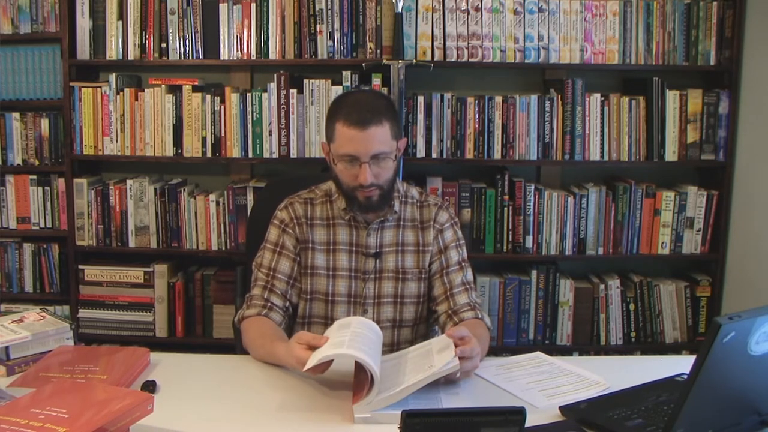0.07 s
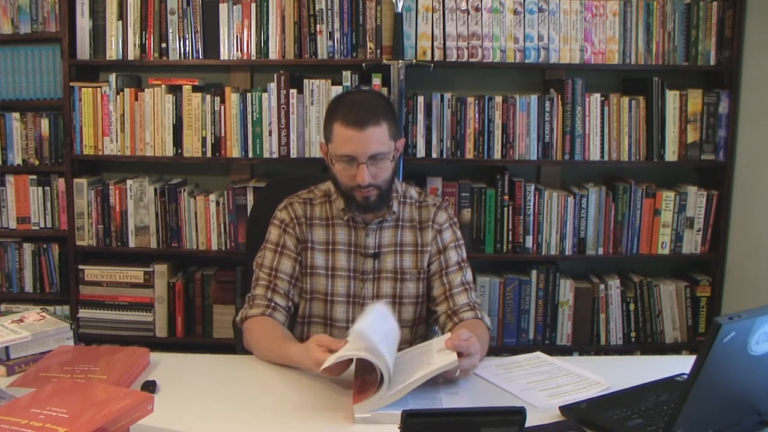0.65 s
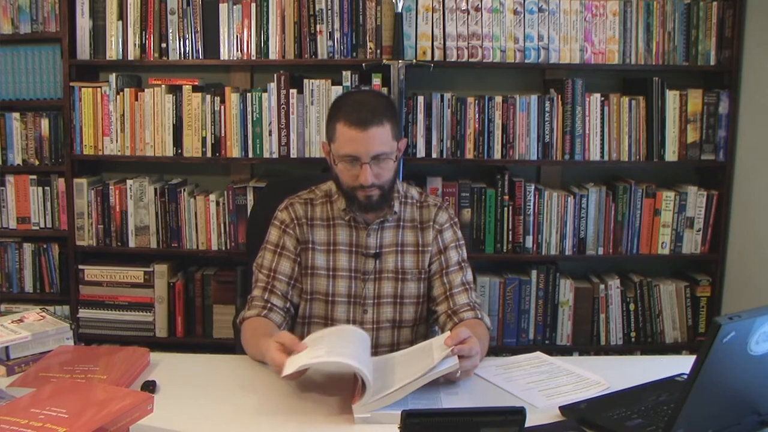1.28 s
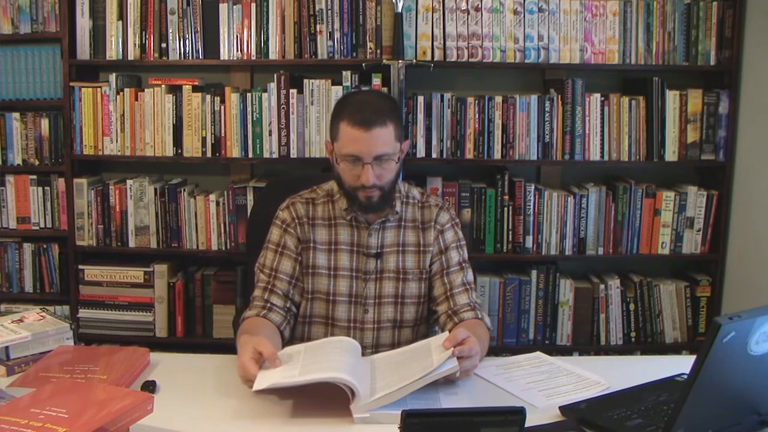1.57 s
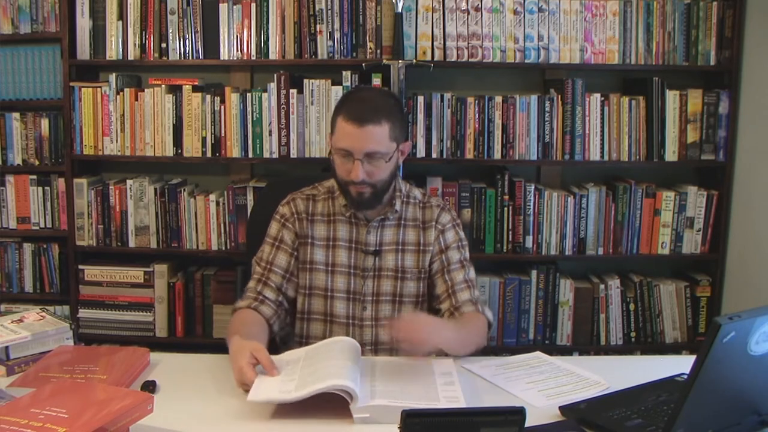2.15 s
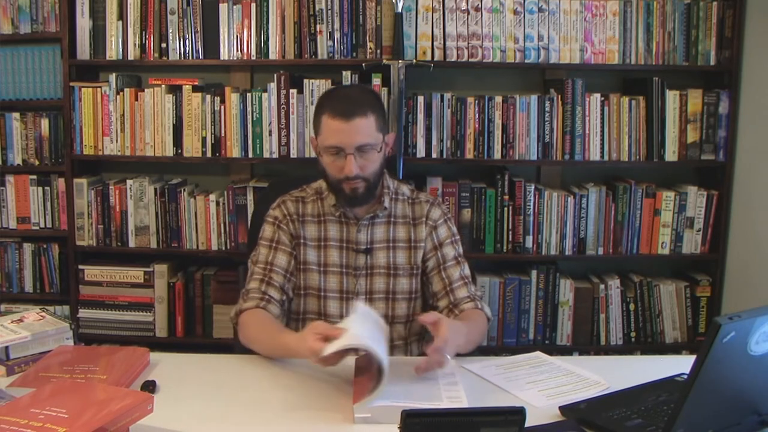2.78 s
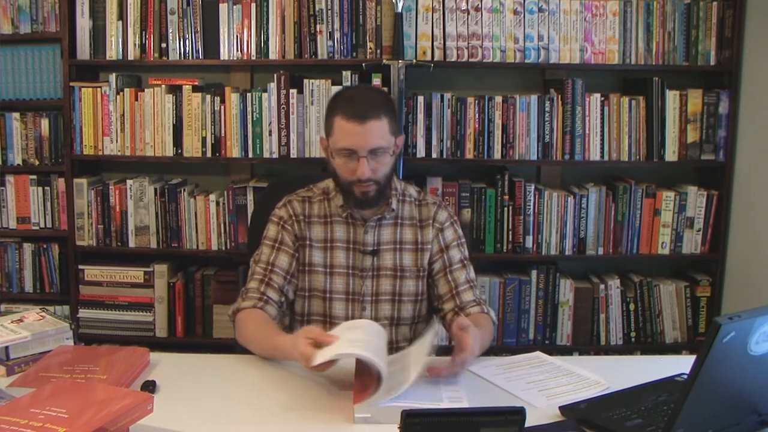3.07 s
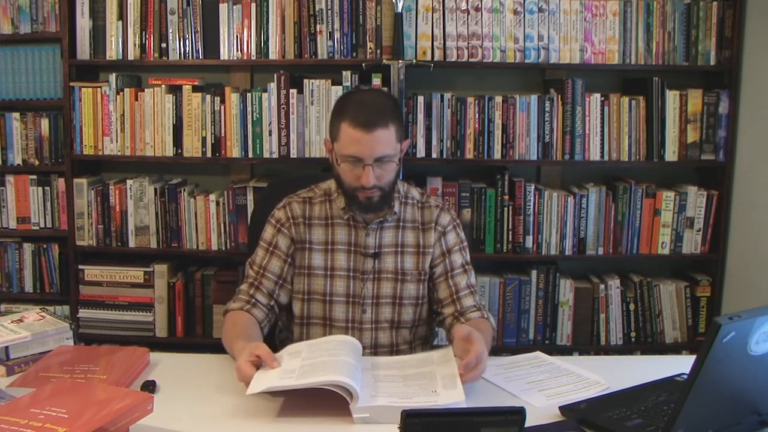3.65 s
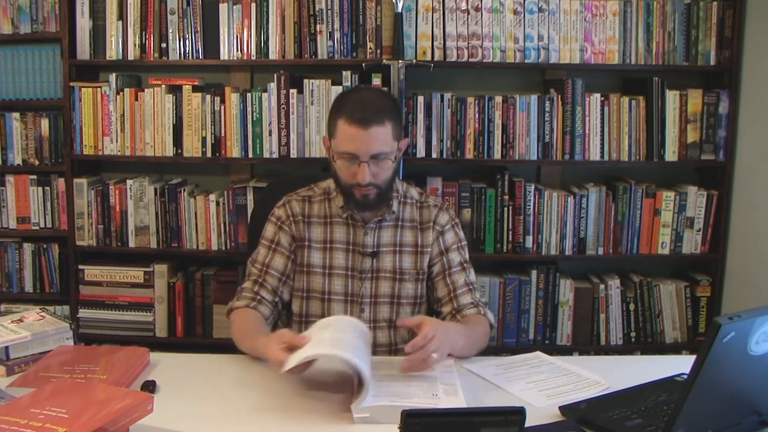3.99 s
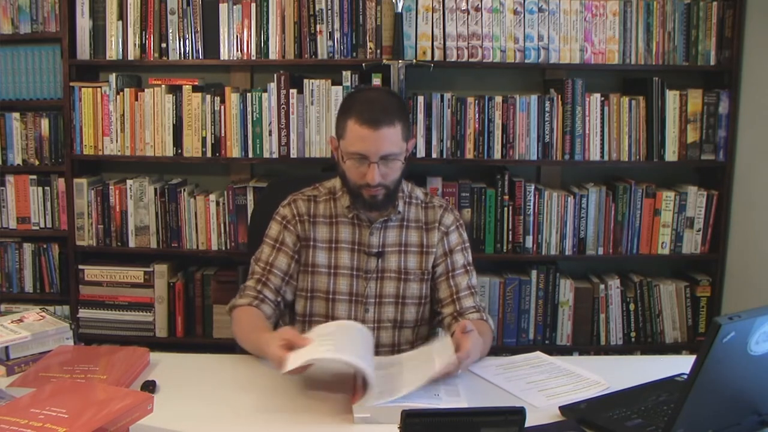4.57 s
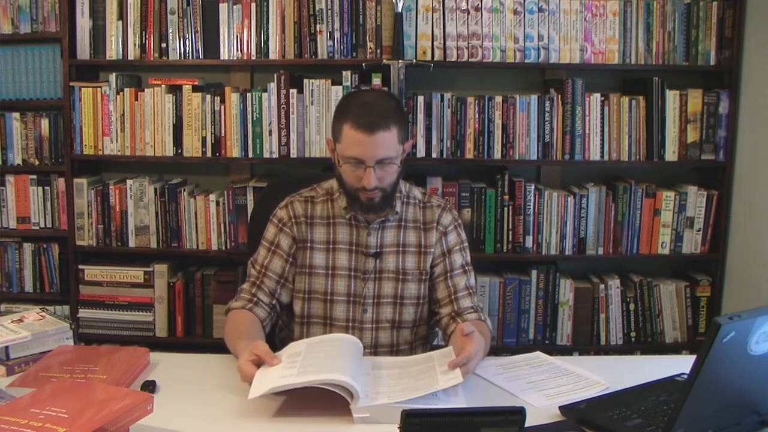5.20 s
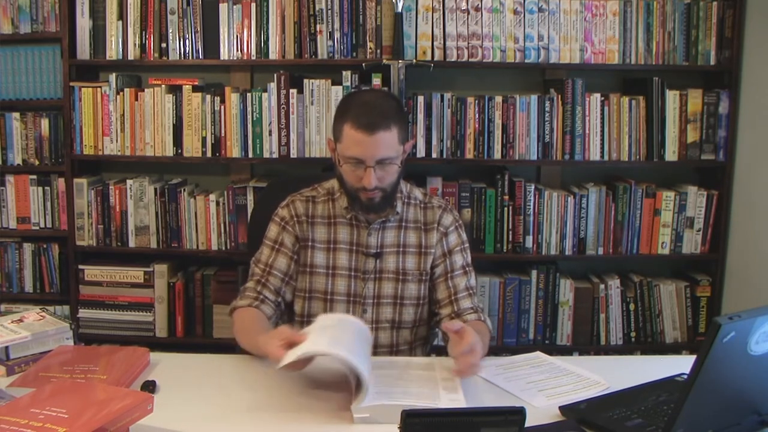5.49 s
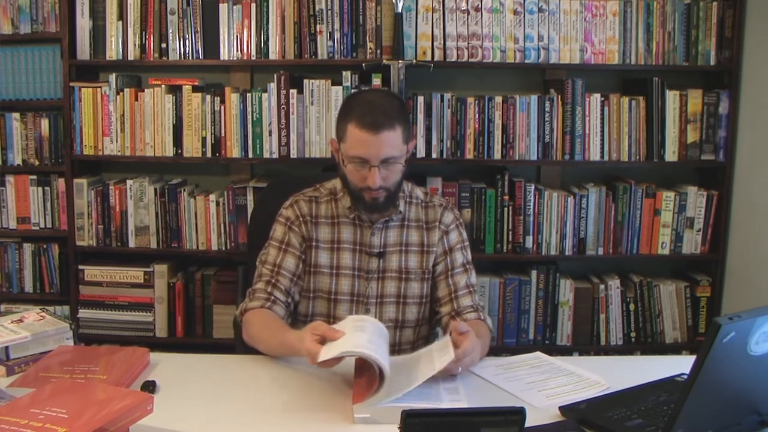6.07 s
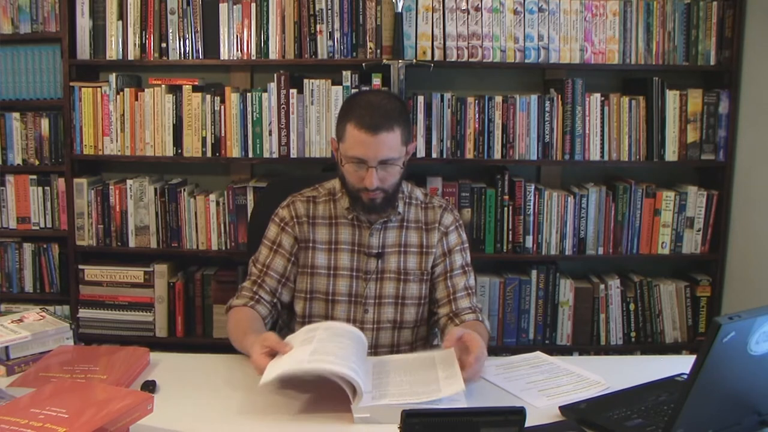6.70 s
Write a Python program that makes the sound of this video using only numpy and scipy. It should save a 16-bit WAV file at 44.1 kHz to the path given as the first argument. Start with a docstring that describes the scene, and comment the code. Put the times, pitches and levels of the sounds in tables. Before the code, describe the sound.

Close, dry paper sounds in a small, quiet room: the pages of a thick book slide, crackle lightly and flip over at an uneven pace. After the first few flicks, the pages land on the desk with one dull thud, the loudest moment. The leafing goes on with crisp ticks, soft flaps, dragging edges and a few gentle knocks. Short echoes follow, over faint room tone, rumble and hiss.

```python
"""Paper ticks and slides: someone leafs through a thick paperback at a desk in a small, quiet room.
Sliding sheets rub by fibre stick-slip, snap free of the thumb and flap over; dragging edges scrape.
Once the heavy block of pages drops and rings the desk; hands bump the book softly.
Short room echoes follow. Under it all lie a low rumble, room tone and a thin hiss."""
import sys
import numpy as np
from scipy import signal
from scipy.fft import rfft, irfft
from scipy.io import wavfile
from scipy.ndimage import uniform_filter1d

SR = 44100
rng = np.random.default_rng(int(sys.argv[2]) if len(sys.argv) > 2 else 0)


def waveform_to_disk(signal):
    """Save audio, clipped to [-1, 1], as 16-bit WAV at the path in sys.argv[1]."""
    frames = np.transpose(np.atleast_2d(signal))
    scaled = np.clip(frames, -1, 1) * 32767
    samples = np.round(scaled).astype(np.int16)
    wavfile.write(sys.argv[1], SR, samples)


N = 306054

# sheet or hand slides over paper: peak t/s, swell/s, fade/s, level/dB, swish offset/dB, fizz offset/dB
STROKES = [(.61, 0.072, 0.043, -76, 17, 6), (.64, 0.027, 0.02, -75, -2, 12), (.78, 0.11, .05, -73.5, 0, -7),
           (1.22, 0.2, 0.5, -73.5, 5.5, -9), (1.49, 0.094, 0.21, -78, -4, -4),
           (1.675, 0.086, 0.077, -59, 1, -7), (1.948, 0.047, 0.022, -67, 8, 10),
           (2.12, 0.099, 0.12, -68, 7, 8.5), (2.24, 0.17, 0.14, -68, 12, -10),
           (2.45, 0.15, 0.21, -63.5, -0.5, 2.5), (2.65, 0.035, 0.049, -68, 9.5, -10),
           (2.72, 0.1, 0.089, -64, 1, -5), (3.29, 0.095, 0.12, -77, 11.5, 4),
           (3.44, 0.14, 0.16, -69, 3.5, -10), (3.575, 0.062, 0.045, -60.5, 5.5, -6),
           (3.804, 0.042, 0.035, -64, -2, 5), (4.03, 0.079, 0.16, -64.5, -4.5, -3.5),
           (4.17, 0.06, 0.036, -68, 0.5, -14), (4.88, 0.22, 0.12, -66.5, -3.5, -12),
           (5.43, 0.12, 0.14, -67, -7, -2.5), (5.53, 0.071, 0.077, -66, -4, -8),
           (5.78, 0.077, 0.042, -70.5, 2, 0), (6.34, 0.23, 0.27, -67, 0.5, -18),
           (6.475, 0.066, 0.021, -65.5, 2, -2), (6.58, 0.075, 0.075, -67, -5, -12),
           (6.77, .025, 0.022, -67.5, -14, -2), (6.84, 0.059, 0.045, -69, -1, -4)]
# friction spectra (hollow swish, broad rub, fine fizz): f/Hz, level/dB
SWISH_SPECTRUM = [(150, -0.5), (400, 0.5), (720, 3), (1100, -2.5), (1700, -3), (2400, -14), (3500, -20),
                  (8000, -40)]
RUB_SPECTRUM = [(800, -11), (1800, 4.5), (2300, 2.5), (3000, -0.5), (3600, -2), (4200, 0), (4800, -5),
                (6500, -9), (7800, -4), (10000, -14.5), (16000, -34)]
FIZZ_SPECTRUM = [(1500, -33), (4000, -4), (6000, -4), (8000, -1), (10500, -5), (15500, -9.5)]
# paper buckles, slips or is tapped: t/s, level/dB, ring f/Hz, crack offset/dB, crack low-pass f/Hz
SNAPS = [(0.495, -47.5, 1980, -18, 6000), (0.654, -48.5, 4460, 3.5, 13000), (0.6605, -54, 4900, 4, 12000),
         (1.029, -40.5, 10500, -2.5, 16000), (1.0342, -43, 920, -5, 4500), (1.0425, -49, 7350, -8, 11000),
         (1.164, -42, 1930, -1, 8460), (1.5407, -39.5, 645, -7, 4000), (1.795, -43.5, 1770, 4.5, 4600),
         (1.859, -39.5, 570, -7, 3000), (1.918, -40, 6500, -16, 13000), (1.932, -50, 8800, 2.5, 14000),
         (1.958, -45, 5300, -2, 13000), (2.1453, -30.5, 2050, -8, 7500), (2.146, -46, 10500, -6, 14000),
         (2.153, -41.5, 9000, -7, 15000), (2.1754, -37, 2440, 0.5, 7000), (2.407, -35.5, 716, -20, 3000),
         (2.764, -51, 3700, -3, 7000), (2.8708, -45.5, 1050, -13, 3500), (3.0065, -47.5, 1100, -5, 3500),
         (3.0549, -28.5, 2000, -13, 7540), (3.0548, -48.5, 6600, -7, 8000), (3.0691, -40, 4730, -14, 9000),
         (3.184, -42, 1170, 1, 5500), (3.1848, -49, 4840, -8, 8500), (3.298, -47, 2250, -12, 4000),
         (3.3404, -39, 2320, -0.5, 13000), (3.3459, -35, 4120, -8, 13900), (3.3464, -37, 8700, -18, 13000),
         (3.3615, -43, 8500, -1, 14000), (3.379, -47.5, 4100, 3, 9000), (3.623, -46, 1800, -5, 4500),
         (3.708, -45, 1760, -5, 3000), (3.798, -43.5, 5500, 2, 12600), (4.2782, -39, 525, -17, 9000),
         (4.2776, -42.5, 3600, -4, 9000), (4.279, -42, 5830, -19, 9000), (4.6755, -46, 1650, -12, 3500),
         (4.689, -51, 1940, -14, 3500), (4.7296, -36, 1880, -5, 7500), (4.735, -45, 4770, 2.5, 13000),
         (4.739, -39.5, 5000, -3, 11000), (4.7425, -28.5, 2070, -19, 5000), (6.093, -49, 1250, -14, 3000),
         (6.182, -41.5, 4700, 2.5, 13000), (6.1854, -41.5, 4400, -3, 12000), (6.197, -48, 4700, 5.5, 11500)]
# sheet flaps over or pats the pile: t/s, level/dB, swell/s, hold/s, low-pass f/Hz, hollow f/Hz
FLAPS = [(1.031, -40.5, 0.0021, 0.0017, 1600, 1426), (1.162, -56.5, 0.00077, .001, 2600, 690),
         (2.171, -38.5, 0.0014, 0.015, 720, 1196), (2.869, -58, 0.00059, 0.00092, 1700, 1080),
         (2.999, -68, 0.0006, 0.00081, 1500, 910), (3.342, -46, 0.0015, 0.028, 2210, 1235),
         (4.274, -55, .001, .001, 1590, 1280), (4.673, -64.5, 0.00083, 0.0091, 3200, 1780),
         (4.734, -36.5, 0.0027, 0.018, 4200, 1287), (4.7573, -42, 0.0027, 0.0043, 2190, 1070),
         (4.946, -55.5, 0.0029, 0.0078, 1180, 955), (6.083, -62.5, 0.0045, 0.0053, 2000, 1250),
         (6.181, -37.5, 0.0021, 0.0088, 2900, 1454), (6.1976, -35, 0.0028, 0.0095, 2380, 797),
         (6.327, -54.5, 0.01, 0.0055, 2000, 1344), (6.345, -55, .006, .006, 1200, 658),
         (6.478, -59.5, 0.0039, 0.005, 1700, 1195)]
# sheet flutter: f/Hz, level/dB
FLAP_SPECTRUM = [(40, -1), (90, 0.5), (170, -9), (360, -4), (460, 4), (545, 1), (640, 5.5), (830, 2),
                 (1200, 5), (1550, 1.5), (2150, -2.5), (2900, -15.5), (4500, -23), (9000, -10.5),
                 (16000, -41)]
# edge drags: peak t/s, swell/s, fade/s, level/dB, resonance f/Hz, glide/(oct/s), width factor
SCRAPES = [(1.667, 0.03, 0.044, -61, 2850, -.5, 1.5), (1.68, .04, 0.047, -65, 8400, -.4, .8),
           (1.69, 0.04, 0.041, -64, 1610, -1, 1.7), (1.94, .018, 0.019, -61.5, 4330, -0.097, 0.92),
           (2.09, 0.038, 0.064, -68, 13800, 0, 1.2), (2.147, .03, 0.015, -67, 9800, 0, 1.8),
           (2.215, 0.025, 0.068, -64, 6570, -0.1, 0.51), (2.365, 0.03, .02, -63, 1640, 0, 0.9),
           (2.41, .045, .05, -65, 10700, -.6, 1), (2.42, 0.22, .15, -65.5, 3170, -.8, 1.5),
           (2.48, 0.066, 0.05, -66, 7840, 0, 1.5), (2.66, 0.033, 0.046, -67, 3240, .8, 1.3),
           (3.29, 0.066, .05, -63, 720, 0, 1.6), (3.578, 0.016, 0.023, -60.5, 4040, 0.091, 0.76),
           (4.018, .03, .045, -67.5, 3880, 0.69, 1), (4.168, .025, 0.029, -70, 3580, 0, .8),
           (5.451, 0.043, 0.089, -68, 1500, -0.059, 1.5), (5.76, .035, .045, -71, 2550, 0, 1),
           (6.305, 0.036, 0.045, -64, 1330, -0.17, 1)]
# bent-paper resonance at width 1: frequency ratio, level/dB
SCRAPE_RESONANCE = [(.6, -42), (.9, -3), (1, -3.5), (1.1, -6.5), (1.5, -54)]
# book or hand meets the desk: t/s, level/dB, high-pass f/Hz, low-pass f/Hz
THUMPS = [(1.705, -42, 170, 420), (2.033, -43, 190, 320), (2.171, -14, 417, 1030), (2.1735, -12, 121, 328),
          (2.1843, -27.5, 151, 1290), (2.2044, -26, 200, 600), (2.217, -32, 130, 600),
          (2.2322, -39, 130, 380), (3.4772, -28.5, 45, 174), (3.704, -38.5, 80, 222),
          (4.7427, -40, 150, 420)]
# modes of the book on the desk: f/Hz, level/dB, T60/s
DESK_MODES = [(89.5, -21, 0.26), (134.4, -7.5, 0.13), (168, -14.5, 0.1), (237, 0, 0.02), (227, -12.5, 0.16),
              (284, -17, 0.11), (323, -23.5, 0.27), (352, -7, 0.033), (376.6, -20, 0.13),
              (516, -16.5, 0.13), (588, -1.5, 0.012), (865, -4, 0.019), (940, -36, .13), (1166, -31, 0.1)]
# hand or sheet lands on the open book: t/s, level/dB
KNOCKS = [(1.0325, -45), (3.183, -57), (3.6923, -39)]
# modes of the open book: f/Hz, level/dB, T60/s
BOOK_MODES = [(337, -1, 0.04), (493, 2, 0.073), (568, -5, 0.086), (750, 6, 0.016), (1110, -3, .025)]
# room decay: f/Hz, T60/s
ROOM_T60 = [(100, 0.079), (330, 0.3), (700, 0.22), (1300, 0.23), (4000, 0.3), (12000, 0.22)]
# rumble (swells as the book is shifted) and room tone: t/s, level/dB
RUMBLE_LEVEL = [(0, -54.5), (1.3, -54.5), (2.0, -53), (2.4, -48), (3.1, -56), (3.55, -46.5), (4.0, -57.5),
                (5.1, -52.5), (6.2, -57), (6.94, -55.5)]
ROOM_TONE_LEVEL = [(0, -59.5), (1.0, -60.5), (2.0, -60), (2.7, -62.5), (3.4, -58), (4.1, -61), (4.9, -61),
                   (5.501, -61), (6.94, -61.5)]
# background spectra (rumble, room tone, mid and side hiss): f/Hz, level/dB
RUMBLE_SPECTRUM = [(10, -1), (22, 5), (45, -0.5), (70, -10), (110, -27.5), (200, -18.5), (500, -62)]
ROOM_TONE_SPECTRUM = [(30, 0), (100, 3), (140, 3), (180, -5.5), (245, 4.5), (280, -3), (355, 2), (425, -4),
                      (490, -5), (590, -10), (750, -7), (1100, -14), (1800, -18.5), (2300, -22.5),
                      (5000, -62)]
HISS_MID_SPECTRUM = [(300, 0.5), (1500, 4.5), (3000, 0), (5000, -1), (9000, -3), (12700, -6.5),
                     (13800, -20), (16000, -19)]
HISS_SIDE_SPECTRUM = [(15, -27), (25, -4), (183, -6.5), (368, -8.5), (523, -9), (1080, -13), (7700, -14.5),
                      (12500, -17), (14300, -23), (15500, -20.5)]


def sliding(swish_db=0.65, rub_db=-1.0, fizz_db=-1.7):
    """Sheets and fingers slide over paper: each stroke drives three bands of friction."""
    power = np.zeros((3, N))
    for peak_s, swell_s, fade_s, db, swish_offset_db, fizz_offset_db in STROKES:
        band_gains = amp([[swish_db + swish_offset_db], [rub_db], [fizz_db + fizz_offset_db]])
        power += (band_gains * stroke(peak_s, swell_s, fade_s, db)) ** 2
    swish, rub, fizz = np.sqrt(power)
    return (swish * friction(SWISH_SPECTRUM) + rub * friction(RUB_SPECTRUM)
            + fizz * friction(FIZZ_SPECTRUM))


def stroke(peak_s, swell_s, fade_s, db, drop_db=9, roundness=1.55):
    """Gain of one slide: it speeds up and slows down in a lopsided bell."""
    t = np.arange(N) / SR - peak_s
    distance = np.minimum(np.maximum(-t / swell_s, t / fade_s), 4)
    return amp(db - drop_db * distance ** roundness)


def friction(spectrum, grains_per_s=7000, spread_db=1.5, judder_db=1.5, patchy_db=2.5):
    """Fibres catch and let go in tiny clicks; the bending sheet keeps shifting their colour."""
    sizes = amp(spread_db * np.minimum(rng.exponential(1, N), 5))
    clicks = sizes * rng.standard_normal(N) * (rng.random(N) < grains_per_s / SR)
    bands = signal.stft(clicks, nperseg=512)[2]
    patches = uniform_filter1d(rng.standard_normal(bands.shape), size=7, axis=0)
    patches = unit(uniform_filter1d(patches, size=7, axis=1))
    clicks = signal.istft(bands * amp(patchy_db * patches), nperseg=512)[1][:N]
    return colour(clicks, spectrum) * amp(judder_db * wander(rate_hz=45))


def snaps(ring_t60_s=0.006, ref_hz=2000, crack_t60_s=0.014, crack_db=-6.0):
    """A buckle or tap rings a patch of paper, with a dry crack: the sharper the fold, the brighter."""
    out, t = np.zeros(N), np.arange(SR // 20) / SR
    for start_s, db, hz, offset_db, top_hz in SNAPS:
        t60_s = ring_t60_s * (ref_hz / hz) ** 0.42  # smaller, higher patches die sooner
        ring = -np.sin(2 * np.pi * hz * t) * amp(-60 * t / t60_s)
        crack = lowpass(rng.standard_normal(len(t)), top_hz, order=3)
        crack *= amp(crack_db + offset_db - 60 * t / crack_t60_s)
        add(out, start_s, amp(db) * (ring + crack))
    return out


def flaps(base_t60_s=0.054, dulling_s=0.033, dulling_ratio=0.66, smoothing_s=0.006, hollow_db=-7):
    """A loose sheet flutters, dulling as it settles; the hollow under it rings."""
    out, t = np.zeros(N), np.arange(SR // 4) / SR
    for start_s, db, swell_s, hold_s, top_hz, hollow_hz in FLAPS:
        noise = coloured_noise(FLAP_SPECTRUM, len(t))
        bright, dull = lowpass(noise, top_hz), lowpass(noise[::-1], top_hz * dulling_ratio)
        settled = np.minimum(t / dulling_s, 1)
        flutter = (1 - settled) * bright + settled * dull
        # the sheet holds a set energy, however its folds share it
        power = abs(uniform_filter1d(flutter ** 2, int(smoothing_s * SR)))
        flutter /= np.sqrt(power + 1e-9)
        hollow = amp(hollow_db) * np.sin(2 * np.pi * hollow_hz * t)
        t60_s = base_t60_s + 2 * hold_s  # longer shudder, slower settling
        envelope = np.minimum(t / swell_s, 1) * amp(-60 * np.maximum(t - swell_s - hold_s, 0) / t60_s)
        add(out, start_s, amp(db) * envelope * (flutter + hollow))
    return out


def scrapes(max_glide_oct=0.5):
    """A dragging edge crackles through one resonance that glides as the sheet bends."""
    out, t = np.zeros(N), np.arange(N) / SR
    for peak_s, swell_s, fade_s, db, hz, glide_oct_per_s, width in SCRAPES:
        spectrum = [(hz * ratio ** width, level_db) for ratio, level_db in SCRAPE_RESONANCE]
        crackle = friction(spectrum, grains_per_s=1800, spread_db=0.5, judder_db=-0.5, patchy_db=-0.5)
        speed = 2 ** np.clip(glide_oct_per_s * (t - peak_s), -max_glide_oct, max_glide_oct)
        gliding = np.interp(np.cumsum(speed) % N, np.arange(N), crackle)
        out += stroke(peak_s, swell_s, fade_s, db) * gliding
    return out


def thumps(puff_db=-26, puff_hz=36, puff_t60_s=0.41, puff_rise_s=0.023):
    """Blows ring the desk: the stiff cover excites high modes, the soft block of pages low ones."""
    out, t = np.zeros(N), np.arange(SR // 2) / SR
    ring = ring_modes(DESK_MODES, t)
    puff_envelope = np.minimum(t / puff_rise_s, 1) * amp(puff_db - 60 * t / puff_t60_s)
    puff = puff_envelope * np.sin(2 * np.pi * puff_hz * t)  # air squeezed from under the book
    for start_s, db, low_hz, high_hz in THUMPS:
        highpass = signal.butter(2, low_hz, "high", fs=SR, output="sos")
        blow = signal.sosfilt(highpass, lowpass(ring, high_hz))
        add(out, start_s, amp(db) * (puff - blow))
    return out


def knocks(rise_s=0.0019):
    """A hand or sheet lands on the open book: a short, dull ring with a cushioned start."""
    out, t = np.zeros(N), np.arange(SR // 4) / SR
    knock = np.minimum(t / rise_s, 1) * ring_modes(BOOK_MODES, t)
    for start_s, db in KNOCKS:
        add(out, start_s, amp(db) * knock)
    return out


def room(x, wet_db, predelay_s, echoes_per_s=3000):
    """Sparse echoes off shelves and walls; each band decays at its own rate."""
    taps = rng.standard_normal(SR // 2) * (rng.random(SR // 2) < echoes_per_s / SR)
    taps[:int(predelay_s * SR)] = 0
    hz, t, bands = signal.stft(taps, SR, nperseg=256)
    decay = amp(-60 * t / at_hz(ROOM_T60, hz)[:, None])
    tail = signal.istft(bands * decay, SR, nperseg=256)[1]
    return amp(wet_db) * signal.fftconvolve(x, tail / np.linalg.norm(tail))[:N]


def background(waver_db=1.0, hiss_mid_db=-69, hiss_side_db=-72):
    """Centred rumble and wavering room tone, plus stereo hiss."""
    t = np.arange(N) / SR
    rumble = amp(np.interp(t, *np.transpose(RUMBLE_LEVEL))) * coloured_noise(RUMBLE_SPECTRUM)
    tone_db = np.interp(t, *np.transpose(ROOM_TONE_LEVEL)) + waver_db * wander(rate_hz=11)
    tone = amp(tone_db) * coloured_noise(ROOM_TONE_SPECTRUM)
    mid = amp(hiss_mid_db) * coloured_noise(HISS_MID_SPECTRUM)
    side = amp(hiss_side_db) * coloured_noise(HISS_SIDE_SPECTRUM)
    return rumble + tone + mid + np.array([side, -side])


def amp(db):
    """dB to gain."""
    return 10 ** (np.asarray(db) / 20)


def unit(x):
    """Scale to rms 1."""
    return x / np.sqrt(np.mean(x ** 2) + 1e-20)


def at_hz(table, hz):
    """Interpolate on a log-frequency axis."""
    table_hz, values = np.transpose(table)
    return np.interp(np.log(hz + 1), np.log(table_hz + 1), values)


def add(mix, start_s, sound):
    """Mix in at start_s."""
    part = mix[round(start_s * SR):][:len(sound)]
    part += sound[:len(part)]


def ring_modes(modes, t):
    """Sum of decaying sines."""
    return sum(amp(db - 60 * t / t60_s) * np.sin(2 * np.pi * hz * t) for hz, db, t60_s in modes)


def colour(x, spectrum):
    """Filter by a spectrum table; rms 1."""
    gains = amp(at_hz(spectrum, np.fft.rfftfreq(len(x), 1 / SR)))
    return unit(irfft(rfft(x) * gains, len(x)))


def coloured_noise(spectrum, samples=N):
    """Shaped Gaussian noise; rms 1."""
    return colour(rng.standard_normal(samples), spectrum)


def lowpass(x, hz, order=2):
    """Butterworth low-pass."""
    return signal.sosfilt(signal.butter(order, hz, fs=SR, output="sos"), x)


def wander(rate_hz):
    """Random motion below rate_hz; rms 1."""
    passband = np.fft.rfftfreq(N, 1 / SR) < rate_hz
    return unit(irfft(rfft(rng.standard_normal(N)) * passband, N))


def scene():
    """Book close and centred, over echoes and background."""
    desk = thumps() + knocks()
    paper = flaps() + sliding() + scrapes()
    ticks = snaps()
    echoes = (room(desk, wet_db=-10.0, predelay_s=0.015)
              + room(paper, wet_db=-11.0, predelay_s=0.003)
              + room(ticks, wet_db=-10.5, predelay_s=0.0022))
    return desk + paper + ticks + echoes + background()


def record(dry):
    """Steep low-pass."""
    cutoff_hz = 15700
    taps = signal.firwin(511, cutoff_hz, window=("kaiser", 8), fs=SR)
    return signal.oaconvolve(dry, taps[None], "same")


dry = scene()
out = record(dry)
waveform_to_disk(out)
```